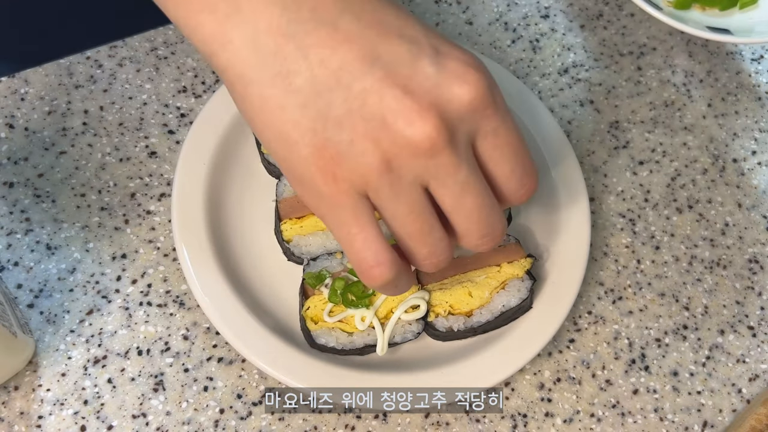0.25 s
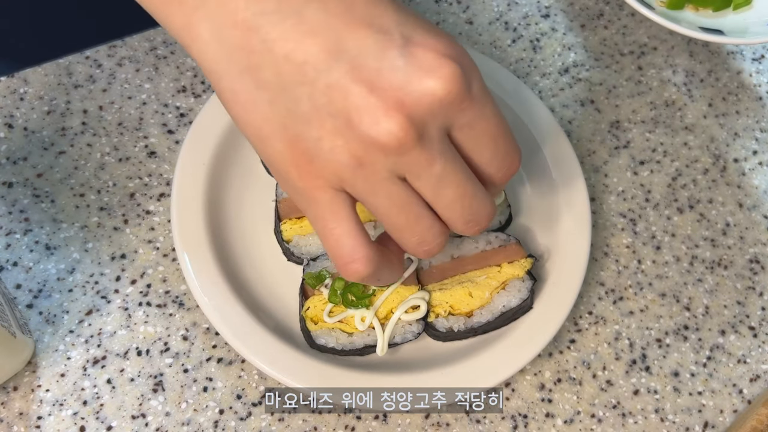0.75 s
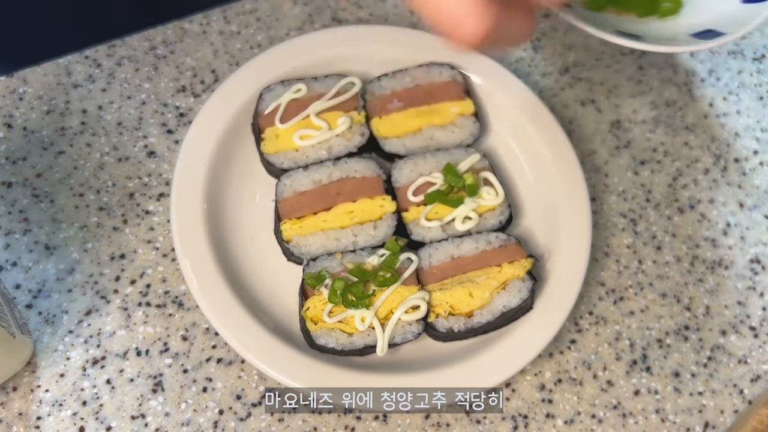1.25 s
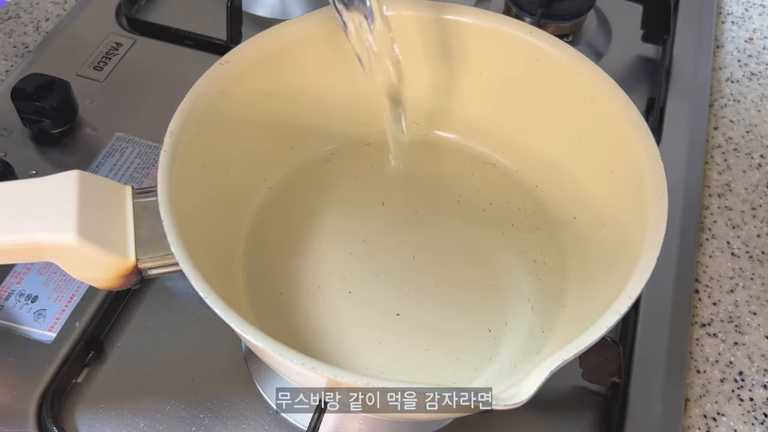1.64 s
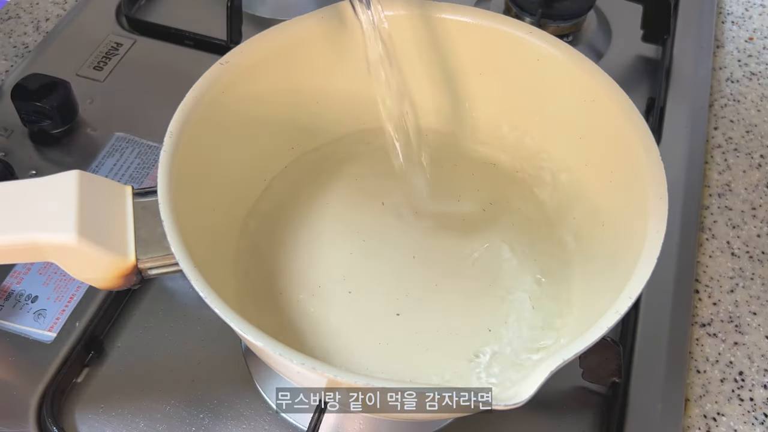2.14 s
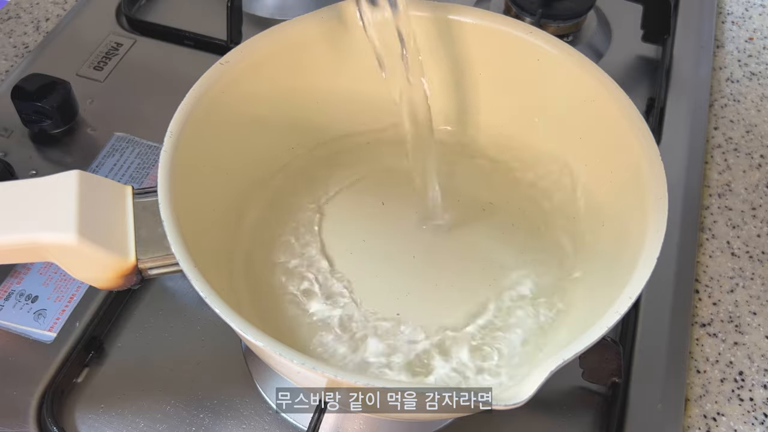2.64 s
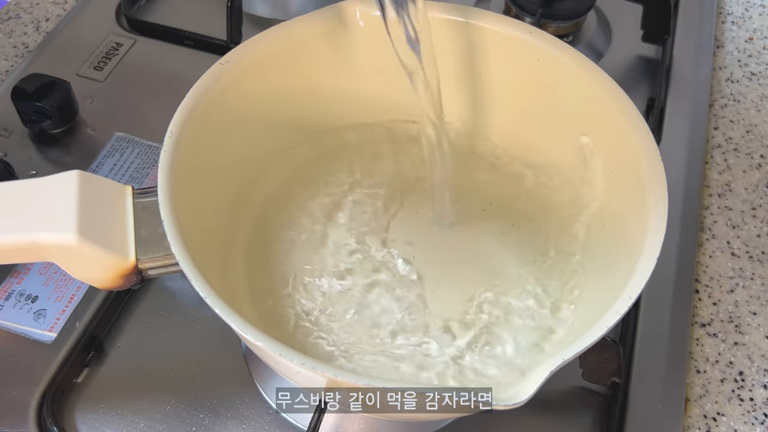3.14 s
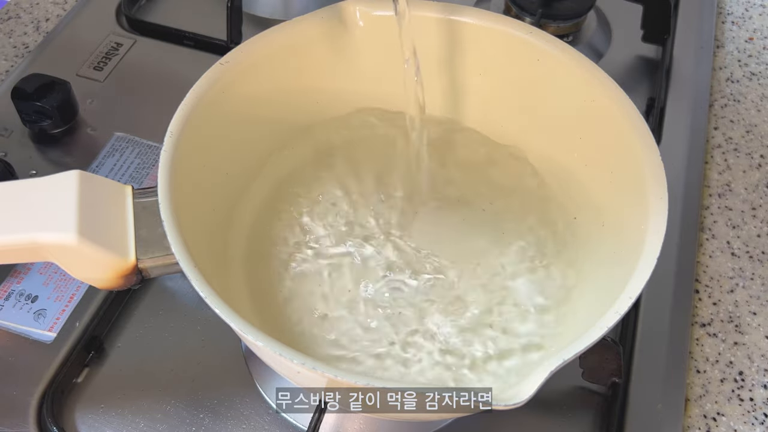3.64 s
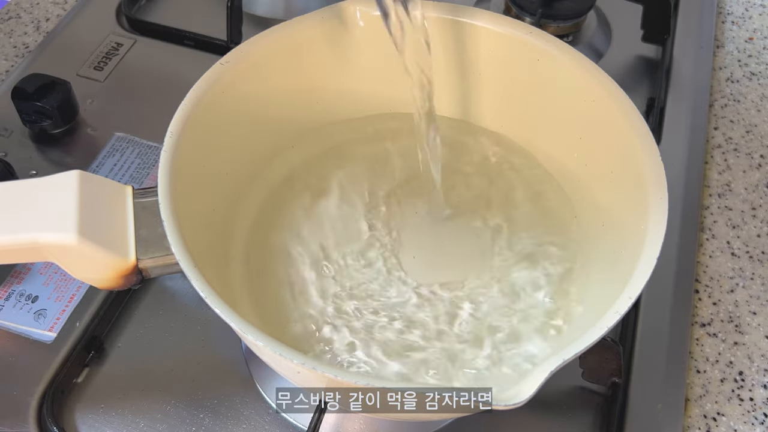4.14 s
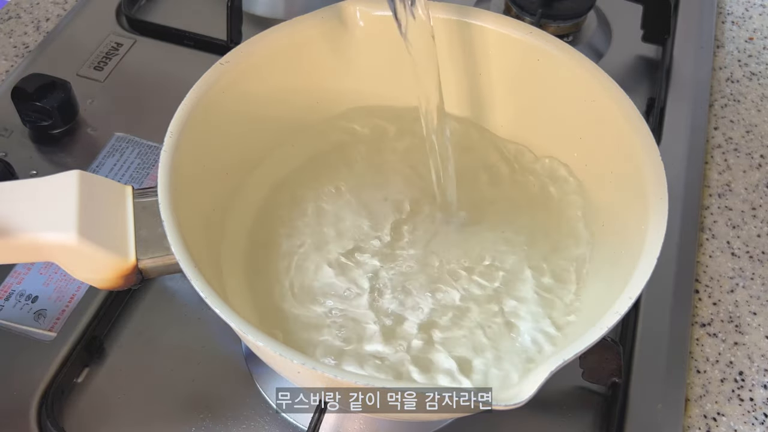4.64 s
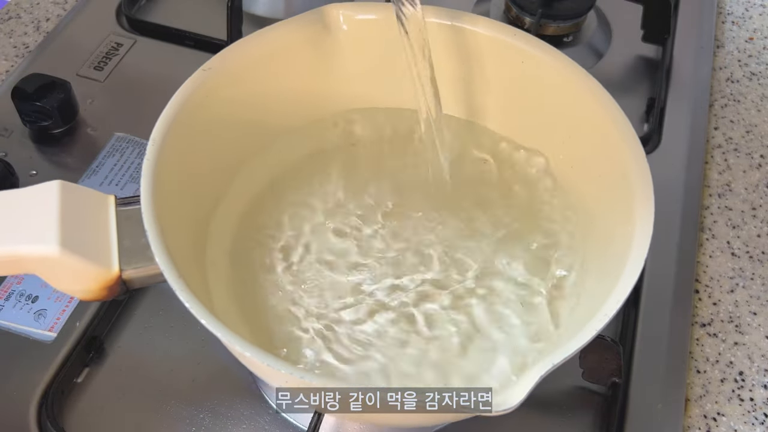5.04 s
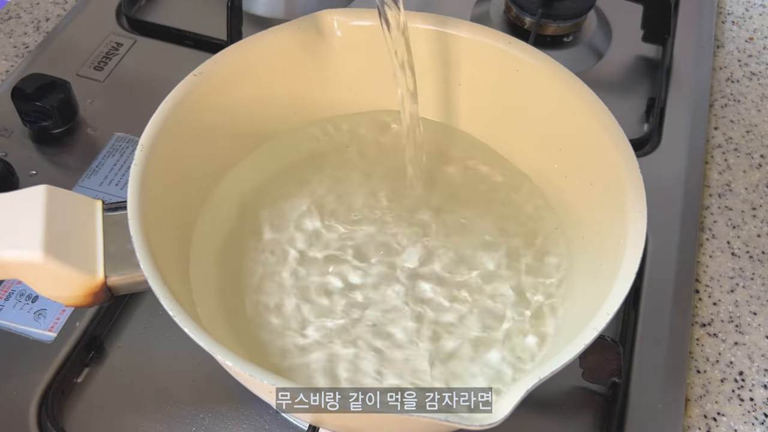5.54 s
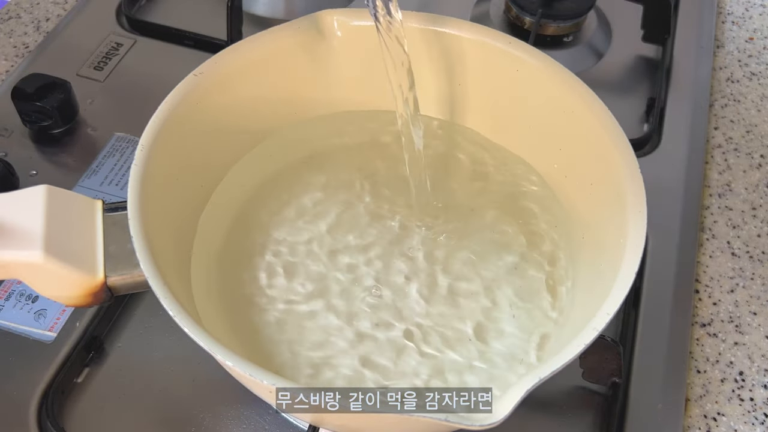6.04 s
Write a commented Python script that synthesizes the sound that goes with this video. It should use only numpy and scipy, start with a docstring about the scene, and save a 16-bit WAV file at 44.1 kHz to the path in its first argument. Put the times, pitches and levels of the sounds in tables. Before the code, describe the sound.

After a faint kitchen hum, water trickles into a pot while a gas stove igniter clicks rapidly and the burner catches.

```python
"""A home kitchen. First the room hums; then the scene changes to the stove, where water is poured into a pot.
Drops splat, bubbles ring as small air springs, and the pot's modes sink under the load of water. An igniter
sparks six times a second, the gas catches with a whoomp and the flame rumbles. Sparks and water echo from
stove top and walls. Two close microphone ports listen; left and right are out of phase in the treble."""
import sys
import numpy as np
from scipy import signal
from scipy.fft import rfft, irfft, next_fast_len
from scipy.io import wavfile

SR = 44100
rng = np.random.default_rng(int(sys.argv[2]) if len(sys.argv) > 2 else 0)


def transcribe(u):
    """Save the signal u as a 16-bit wav file named by the first command-line argument.

    u: samples, shape (n,) or (channels, n), limited to [-1, 1]; the rate is SR.
    q: integer samples, one column per channel.
    """
    v = np.clip(np.atleast_2d(u).T, -1, 1)
    q = np.round(v * 32767).astype(np.int16)
    wavfile.write(sys.argv[1], SR, q)


N = 276948

# Backgrounds, humming room and stove: f/Hz, spectral density/dB, left-right correlation
HUM_SPECTRUM = [(30, -91, 0.83), (60, -87, 0.98), (126, -83, 0.91), (154, -89.5, 0.37), (221, -74.5, 0.97),
                (265, -80.5, 0.65), (338, -99.5, 0.17), (422, -83.5, 0.59), (554, -94.5, -0.17),
                (1037, -94.5, -0.16), (1060, -103, -0.46), (1580, -99, -0.34), (2160, -105, 0.84),
                (5030, -107, 0.57), (7560, -102, 0.9), (8400, -101, 0.64), (8850, -103, 1),
                (10800, -110, 1), (11600, -106, 0.028), (12900, -111, 1), (16000, -113, 1)]
STILL_SPECTRUM = [(30, -93, 0.68), (67.6, -84.5, 0.99), (207, -93.5, 0.9), (466, -103, 0.5),
                  (940, -112, 0.14), (2180, -118, 0.75), (3830, -129, 0.35), (9300, -136, 0.5),
                  (16000, -136, 1)]
# Three flame bands, spray, scattered spark echoes: f/Hz, relative density/dB, left-right correlation
RUMBLE_SPECTRUM = [(25.3, -32, 0.76), (59, 5, 1), (85, 3, 0.97), (125, 3.5, 1), (199, -13, 1),
                   (432, -34, 1)]
ROAR_SPECTRUM = [(95, -5, 1), (177, 12.5, 0.98), (315, 1, 1), (465, -32, 0.27), (900, -47, 0.32)]
FLARE_SPECTRUM = [(232, 0.5, 0.77), (405, -4, 0.9), (815, -8, 0.12), (1980, -27.5, 0.19), (4040, -51, .7)]
SPRAY_SPECTRUM = [(408, 1.5, 0.23), (990, -33, 0.17), (2040, -1, 1), (3650, 10, 0.55), (5350, 8, 0.79),
                  (7000, 5.5, 1), (8600, 8, 0.72), (9400, -24, 1), (11100, 9, 0.81), (12400, -5, 1),
                  (15900, 3, 0.63)]
SCATTER_SPECTRUM = [(707, -16, 0.27), (1500, -21, 0.35), (2930, -18.5, 0.98), (4880, -13.5, 0.49),
                    (6500, -8.5, 0.5), (8100, -4.5, 0.71), (10150, -7, 1), (11080, -1, 0.87),
                    (12800, -13, 0.6), (15800, -12, 1)]
# Handling bumps, the gas catching at 2.6 s, flutters: t/s, hold/s, swell/dB, rumble/dB, roar/dB, flare/dB
LOW_PUFFS = [(1.364, .005, -1, -80, -50, -62.5), (1.507, 0.085, -4.5, -71, -60, -67),
             (1.683, 0.095, 0, -60.5, -62, -60), (1.885, 0.053, -1, -54, -57.5, -63.5),
             (1.997, 0.041, 0, -58, -75, -90), (2.058, 0.015, -2, -53, -60, -66),
             (2.297, .19, 4.5, -61.5, -74.5, -74.5), (2.61, 0.069, 5, -44.5, -51, -50.5),
             (2.725, 0.071, 1.5, -39.5, -42, -49), (2.984, 0.82, -3, -61.5, -64, -67),
             (4.176, 0.064, 4, -63, -62.5, -58), (4.795, 0.13, 7, -59.5, -60, -76.5),
             (5.024, 0.24, 2, -56, -53.5, -69), (5.93, 0.0089, -5, -60, -77, -90)]
# Course of the pour: t/s, spray/dB, small bubbles/dB, tiny bubbles/dB
POUR_LEVELS = [(1.5, -102, -86, -106), (1.85, -102, -77, -89), (2.1, -84, -94, -76),
               (2.27, -58.5, -76, -74), (2.5, -72, -75, -69), (2.75, -91, -59.5, -62),
               (2.92, -56, -69.5, -60.5), (3.28, -71, -64, -54.5), (3.45, -60, -62, -64.5),
               (3.65, -61.5, -58.5, -60), (3.92, -69.5, -80, -67), (4.15, -63, -70.5, -64),
               (4.34, -56.5, -74, -72), (4.55, -57, -63.5, -58.5), (4.76, -57.5, -62.5, -61),
               (4.96, -66.5, -68.5, -66), (5.48, -61, -79, -67), (5.8, -67.5, -71.5, -71.5),
               (6.07, -63, -81, -68.5), (6.28, -58.5, -77, -62)]
# The louder bursting drops and bubbles: t/s, level/dB, f/Hz
LOUD_SPLATS = [(1.5904, -44, 10100), (1.7084, -47, 12000), (1.755, -48, 5100), (1.7786, -37.5, 11200),
               (1.888, -40, 10800), (1.9124, -33.5, 10900), (1.939, -30, 9000), (1.9704, -38.5, 2640),
               (2.0292, -48, 12800), (2.0907, -23.5, 12400), (2.1312, -26, 6900), (2.1463, -32, 11710),
               (2.226, -29, 14430), (2.293, -39.5, 4900), (2.3144, -24.5, 10060), (2.322, -25, 6800),
               (2.391, -36, 6050), (2.5457, -34.5, 10300), (2.6542, -34, 3550), (2.7119, -33, 12500),
               (2.758, -33, 3030), (2.979, -33, 5500), (3.1114, -26, 3260), (3.1835, -22.5, 8900),
               (3.2045, -40, 4040), (3.254, -32, 10500), (3.2914, -42, 5500), (3.5643, -31.5, 14700),
               (4.193, -41.5, 4700), (4.3058, -36.5, 11490), (4.338, -30.5, 7400), (4.4175, -37, 8140),
               (4.4998, -29, 13800), (4.762, -33, 7350), (4.7743, -33, 9400), (5.0476, -42.5, 2870),
               (5.0767, -40.5, 11120), (5.1379, -38, 8100), (5.285, -38, 12900), (5.429, -45, 11830),
               (5.9578, -41.5, 3250), (6.2425, -42.5, 2970)]
LOUD_BUBBLES = [(1.842, -40.5, 3120), (1.888, -40.5, 5160), (1.971, -45, 2700), (2.1314, -32, 3680),
                (2.321, -49, 2980), (2.692, -43, 3050), (2.8434, -42.5, 2400), (2.8462, -42.5, 1363),
                (2.8548, -38.5, 5400), (2.9848, -44.5, 1360), (2.9966, -40, 782), (3.015, -39, 5800),
                (3.108, -45, 1320), (3.1198, -28.5, 6400), (3.131, -39, 3100), (3.192, -36.5, 1700),
                (3.194, -37.5, 1360), (3.2297, -33.5, 1984), (3.2545, -38, 8360), (3.3075, -40.5, 1330),
                (3.3376, -42, 2680), (3.38, -42.5, 2660), (3.5093, -43, 1400), (3.519, -44, 2600),
                (3.6487, -39, 3620), (3.653, -48, 1980), (3.6556, -53, 723), (3.7896, -45.5, 2980),
                (4.2162, -45, 780), (4.353, -41, 7800), (4.354, -44.5, 1860), (4.3623, -38.5, 3520),
                (4.4007, -49, 994), (4.5887, -50, 1405), (4.593, -42, 3920), (4.6302, -45.5, 1054),
                (4.6936, -39, 4270), (4.724, -43.5, 978), (4.7666, -44.5, 2090), (4.7667, -41, 4080),
                (5.0978, -47, 3540), (5.2055, -43, 8950), (5.229, -51.5, 2530), (5.4725, -50, 1520),
                (5.4792, -44, 3130), (5.588, -41.5, 8260), (5.689, -42, 6800), (5.812, -53.5, 3300),
                (6.026, -40.5, 8050), (6.1896, -46.5, 3400)]
# Air and wall of the pot under the trickle: f/Hz, bandwidth/Hz, gain/dB
POT_RESONANCES = [(2760, 80, 6), (3320, 120, -5), (3900, 91, -3), (7200, 55, -1), (7950, 94, -1),
                  (9180, 120, -9)]
# Igniter discharges: t/s, level/dB
SPARK_EVENTS = [(2.0646, -15.5), (2.2446, -16), (2.4245, -15), (2.596, -15.5), (2.7703, -15), (2.9336, -16),
                (3.0956, -17), (3.2684, -15.5), (3.4319, -16), (3.5966, -16), (3.7585, -16.5),
                (3.9204, -15.5), (4.0829, -16)]
# Paths of a snap by way of burner and pot: delay/s, gain/dB
SNAP_PATHS = [(0, -3.5), (.0007, -0.5), (.0011, 0.5), (.0025, -10), (.0029, -5.5), (.0036, -14),
              (.0043, -10.5), (.009, -26)]
# Resonances of the burner: f/Hz, bandwidth/Hz, gain/dB
BURNER_MODES = [(1470, 480, -19.5), (2560, 370, -16.5), (4050, 520, -13.5), (6080, 2000, 0.5),
                (7810, 510, 6), (8560, 970, 5.5), (10860, 1000, 7), (14000, 5300, 0)]
# Lightly struck metal: f/Hz, gain/dB, T60/s
CLINK_MODES = [(1545, -17, .18), (2503, -7, .13), (3747, -4, .13), (4457, -16, .07), (5066, -14, .1)]
# Hum of the filling pot: t/s, pitch factor, level/dB
POT_FILLING = [(2.55, 1.02, -120), (2.8, 1.02, -74), (3.4, .99, -67), (4.0, .95, -86), (4.35, .84, -86),
               (4.6, .82, -74), (5.0, .81, -80), (6.28, .8, -79)]
# Modes of the pot: f/Hz at pitch factor 1, gain/dB, T60/s, exponent on the pitch factor
POT_MODES = [(730, -6.5, 0.098, 0.031), (1349, -1.5, 0.13, 0.984), (2237, -3, 0.095, 1.6)]
# Reverberation by band: f/Hz, T60/s, gain/dB, left-right correlation
ECHO_BANDS = [(680, 0.51, 4.5, 0.31), (1520, 0.29, -4, 0.15), (3210, 0.17, -0.5, 0.98),
              (6400, 0.53, -10.5, 0.5), (7800, 0.12, -5, 0.95), (10800, 0.14, 0.5, 0.99),
              (12000, 0.097, -9.5, 0.74), (14700, 0.091, -23, 0.3)]
# Level difference of the ports: f/Hz, left minus right/dB
PORT_LEVEL_GAP = [(60, 0), (120, -2.5), (240, -2), (480, -3), (950, 1), (1890, 1.5), (3770, 1), (7520, 0.5),
                  (15000, -0.5)]
# Left-right phase difference, growing through the treble: f/Hz, lead of the left/rad
STEREO_PHASE_GAP = [(0, 0), (2200, 0), (3600, .75), (5200, .2), (6500, 0), (7500, -.1), (8600, -1.3),
                    (9400, -3.0), (10800, -3.3), (12000, -5.1), (12800, -6.2), (14300, -6.5), (15500, -8.8),
                    (16500, -9.6), (22050, -15)]

TIME = np.arange(N) / SR


def amp(db):
    """Decibels to amplitude ratio."""
    return 10 ** (np.asarray(db) / 20)


def rms_one(x):
    """Scale to rms 1."""
    return x / np.sqrt(np.mean(x ** 2) + 1e-30)


def in_time(rows):
    """Columns of a curve table, one value per sample."""
    s, *columns = np.transpose(rows)
    return [np.interp(TIME, s, c) for c in columns]


def bandpass(x, edges_hz, order=2):
    """Pass the band between two frequencies."""
    return signal.sosfilt(signal.butter(order, edges_hz, "band", fs=SR, output="sos"), x)


def pair(mid, side, correlation):
    """Left and right as sum and difference of a shared and an opposed part."""
    correlation = np.clip(correlation, -1, 1)
    opposed = np.sqrt(1 - correlation) * side * np.array([[1], [-1]])
    return (np.sqrt(1 + correlation) * mid + opposed) / np.sqrt(2)


def noise(spectrum):
    """Stereo noise of given spectral density and correlation."""
    size = next_fast_len(N)
    hz, db, correlation = np.transpose(spectrum)
    log_hz = np.log(np.fft.rfftfreq(size, 1 / SR) + 1)
    gain = amp(np.interp(log_hz, np.log(hz), db, left=-140)) * np.sqrt(SR / 2)
    mid, side = rfft(rng.standard_normal((2, size))) * gain
    return irfft(pair(mid, side, np.interp(log_hz, np.log(hz), correlation)), size)[:, :N]


def drift(hz):
    """Slow random fluctuation of rms 1: low-passed noise."""
    r = np.exp(-80 * np.pi * hz / SR)
    slow = signal.lfilter([1], [1, -2 * r, r * r], rng.standard_normal(N // 40 + 2002))[2000:]
    return np.interp(np.arange(N) / 40, np.arange(len(slow)), rms_one(slow))


def decay(x, t60):
    """Each impulse leaves an exponential tail."""
    return signal.lfilter([1], [1, -amp(-60 / (t60 * SR))], x + 1e-18)


def ring(x, hz, t60):
    """Damped resonator: a unit impulse starts a sine of amplitude 1."""
    r, w = amp(-60 / (t60 * SR)), 2 * np.pi * hz / SR
    return signal.lfilter([0, np.sin(w)], [1, -2 * r * np.cos(w), r * r], x + 1e-18)


def ring_time(width_hz):
    """A resonance's T60 is inversely proportional to its bandwidth."""
    return np.log(1000) / np.pi / width_hz


def add(out, s, sound):
    """Superpose a short sound at time s."""
    i = round(s * SR)
    out[i:i + len(sound)] += sound[:N - i]


def room_hum():
    """Stationary noise whose low spectral peaks are heard as a hum."""
    return noise(HUM_SPECTRUM)


def bumps_and_flame(lit_s=2.9, rise_db_per_s=900, fall_db_per_s=230):
    """Incoherent sources add in power: bumps and flame puffs ride on a bed that is louder once gas burns."""
    t = TIME[::40]
    bed_db = np.where(t < lit_s, -73, -58.5 - 2.0 * (t - lit_s))
    power = amp(bed_db + np.array([[0], [-8.5], [-18.5]])) ** 2   # rumble, roar, flare
    for s, hold, swell_db, *levels_db in LOW_PUFFS:
        shape_db = swell_db * np.clip((t - s) / hold, 0, 1)
        shape_db -= rise_db_per_s * np.maximum(s - t, 0) + fall_db_per_s * np.maximum(t - s - hold, 0)
        power += amp(np.array(levels_db)[:, None] + shape_db) ** 2
    rumble_db, roar_db, flare_db = [np.interp(TIME, t, 10 * np.log10(p)) for p in power]
    rumble = amp(rumble_db + 1.65 * drift(10.3)) * rms_one(noise(RUMBLE_SPECTRUM))
    roar = amp(roar_db + 1.25 * drift(23)) * rms_one(noise(ROAR_SPECTRUM))
    flare = amp(flare_db + 2.3 * drift(27)) * rms_one(noise(FLARE_SPECTRUM))
    return rumble + roar + flare


def splats(spray_db, per_s=16.0, shallow_until_s=4.0):
    """A brief pulse has a broad spectrum: each bursting drop is a millisecond puff of noise."""
    out, envelope = np.zeros(N), np.exp(-TIME[:400] / 0.00092)
    gap, size, pitch = rng.random((200, 3)).T
    when = np.cumsum(-np.log(1 - gap)) / per_s   # small splats arrive as a Poisson process
    small = [(s, spray_db[int(s * SR)] + 16.5 - 9 * z, 4000 * 3.9 ** p)
             for s, z, p in zip(when, size, pitch) if s * SR < N - 1]
    for (s, db, hz), puff in zip(LOUD_SPLATS + small, rng.standard_normal((300, 400))):
        # on shallow water, harder splats are broader
        width = hz * (.3 + 0.34 * max(db + 35.5, 0) * (s < shallow_until_s))
        burst = bandpass(puff * envelope, np.clip([hz - width / 2, hz + width / 2], 0.42 * hz, .45 * SR))
        add(out, s, amp(db) * burst / abs(burst).max())
    return out


def first_splash(s=1.679, db=-60, t60=0.2):
    """Impact of water on the dry pot: dull noise with a sudden onset and exponential decay."""
    out, t = np.zeros(N), TIME[:round(.2 * SR)]
    burst = bandpass(rng.standard_normal(len(t)), [400, 2200])
    add(out, s, amp(db - 60 * t / t60) * rms_one(burst))
    return out


def bubble(t, hz, db, t60, rise, onset_cycles):
    """Trapped air is a spring and the water around it a mass: a damped sine, rising in pitch."""
    envelope = amp(db - 60 * t / t60) * (1 - np.exp(-t * hz / onset_cycles))
    return envelope * np.sin(2 * np.pi * hz * (t + rise * t ** 2 / t60))


def swarm(low_hz, high_hz, cycles, rise, spread_db, count):
    """Superposition of many bubbles born in clumps, scaled to rms 1."""
    when, pitch, life, size = rng.random((count, 4)).T[:, :, None]
    births = np.cumsum(amp(6 * drift(12)))
    start = np.searchsorted(births, when * births[-1])
    hz = low_hz * (high_hz / low_hz) ** pitch
    t60 = cycles * (0.23 + 2.8 * life) / hz
    db = -spread_db * np.log(np.maximum(size, 1 / 25))
    sounds = bubble(TIME[:700], hz, db, t60, rise, onset_cycles=0.53)
    return rms_one(np.bincount((start + np.arange(700)).ravel(), sounds.ravel(), N + 900)[:N])


def trickle(small_db, tiny_db):
    """Smaller bubbles resonate higher: small ones gurgle, tiny ones fizz, and the pot colours both."""
    small = swarm(low_hz=1099, high_hz=5790, cycles=21.0, rise=0.093, spread_db=5.0, count=4000)
    tiny = swarm(low_hz=6080, high_hz=13600, cycles=48.0, rise=0.083, spread_db=2.5, count=3500)
    direct = amp(small_db) * small + amp(tiny_db) * tiny
    return direct + sum(amp(db) * 2 * np.pi * width / SR * ring(direct, hz, ring_time(width))
                        for hz, width, db in POT_RESONANCES)


def loud_bubbles():
    """Single bubbles ring out; damping grows with frequency, so high ones die sooner."""
    out, t = np.zeros(N), TIME[:round(.12 * SR)]
    for s, db, hz in LOUD_BUBBLES:
        t60 = 0.032 * (1000 / hz) ** 0.64
        add(out, s, bubble(t, hz, db, t60, rise=0.066, onset_cycles=0.64))
    return out


def sparks(jitter_s=.00006):
    """Multipath arrival: each snap takes the same few paths, varying a little, and rings the burner."""
    late, loud = rng.standard_normal((2, len(SPARK_EVENTS), len(SNAP_PATHS)))
    delay, path_db = np.transpose(SNAP_PATHS)
    s, spark_db = np.transpose(SPARK_EVENTS)[:, :, None]
    arrivals = np.round((s + delay + jitter_s * late) * SR).astype(int)
    out = 0
    for k, (hz, width, db) in enumerate(BURNER_MODES):
        clicks = np.zeros(N)
        chance_db = 2 * loud + 2 * rng.standard_normal(s.shape)
        clicks[arrivals] = amp(spark_db + path_db + db - 6.5 + chance_db)
        out += (-1) ** k * ring(clicks, hz, ring_time(width))
    return out


def spark_scatter(delay_s=.003):
    """Diffuse reflection after each snap, never twice the same: quick off the stove, slow off the walls."""
    clicks = np.zeros(N)
    s, spark_db = np.transpose(SPARK_EVENTS)
    clicks[np.round((s + delay_s) * SR).astype(int)] = amp(spark_db)
    envelope = amp(-17) * decay(clicks, t60=0.022) + amp(-23.5) * decay(clicks, t60=0.24)
    return envelope * rms_one(noise(SCATTER_SPECTRUM))


def spray(level_db):
    """Random amplitude modulation: three bands of fine hiss swell together and flicker separately."""
    hiss, out = rms_one(noise(SPRAY_SPECTRUM)), 0
    shared_db = 1.5 * drift(1.8)
    for band_hz in [(300, 4660), (4800, 9000), (9500, 15700)]:
        out += amp(shared_db + 2.8 * drift(19.7)) * bandpass(hiss, band_hz)
    return amp(level_db + 3.0) * out


def clink(s=2.1305, strike_db=-44.5):
    """Free vibration after one light touch of metal on metal."""
    click = np.zeros(N)
    click[round(s * SR)] = amp(strike_db)
    return sum(amp(db) * ring(click, hz, t60) for hz, db, t60 in CLINK_MODES)


def pot_hum(impacts_per_s=250, spread_db=6.0):
    """Mass loading: the stream drums on the pot, whose modes sink as the water gathers."""
    pitch_factor, level_db = in_time(POT_FILLING)
    out = 0
    for hz, db, t60, sink in POT_MODES:
        sizes = amp(spread_db * np.minimum(rng.exponential(1, N), 5)) * rng.choice([-1, 1], N)
        impacts = sizes * (rng.random(N) < impacts_per_s / SR)
        # a mode of moving pitch: shift down to 0 Hz, decay, shift back
        phasor = np.exp(2j * np.pi * np.cumsum(hz * pitch_factor ** sink) / SR)
        out += amp(db) * np.real(phasor * decay(impacts / phasor, t60))
    return amp(level_db) * rms_one(out)


def reverberation(x):
    """Convolution with dense echoes that decay band by band, quickly off the stove, slowly off the walls."""
    t, response = TIME[:round(.4 * SR)], 0
    onset = 1 - np.exp(-(t / 0.0021) ** 2)
    stove_top = amp(11 - 60 * t / 0.039)
    for hz, t60, db, correlation in ECHO_BANDS:
        band = bandpass(rng.standard_normal((2, len(t))), [hz * 0.76, min(hz * 1.22, .45 * SR)], order=1)
        walls = amp(-60 * t / t60)
        response += amp(db) * pair(*band, correlation) * (walls + stove_top) * onset
    return signal.fftconvolve(x[None], response, axes=1)[:, :N]


def scene(room_ends_s=1.356):
    """The humming room, then a 4 ms crossfade to the superposed sources at the stove."""
    spray_db, small_db, tiny_db = in_time(POUR_LEVELS)
    low = bumps_and_flame()
    snaps = sparks()
    pour = splats(spray_db) + loud_bubbles() + clink() + pot_hum()
    pour += trickle(small_db, tiny_db) + first_splash()
    echoes = reverberation(amp(-41.5) * snaps + amp(-35.5) * pour) + spark_scatter()
    room = room_hum()
    stove = noise(STILL_SPECTRUM) + low + snaps + pour + echoes + spray(spray_db)
    in_room = np.clip((room_ends_s - TIME) / 0.004, 0, 1)
    return in_room * room + (1 - in_room) * stove


def record(dry, cutoff_hz=16900):
    """Linear filtering: left and right differ a little in level and, in the treble, in phase; the top is cut."""
    size = next_fast_len(N + 2000)
    hz = np.fft.rfftfreq(size, 1 / SR)
    gap_db = np.interp(hz, *np.transpose(PORT_LEVEL_GAP))
    gap_rad = np.interp(hz, *np.transpose(STEREO_PHASE_GAP))
    half_gap = amp(gap_db / 2) * np.exp(.5j * gap_rad)
    stereo = irfft(rfft(dry, size) * [half_gap, 1 / half_gap], size)[:, :N]
    return signal.sosfilt(signal.cheby2(14, 70, cutoff_hz, fs=SR, output="sos"), stereo)


dry = scene()
out = record(dry)
transcribe(out)
```